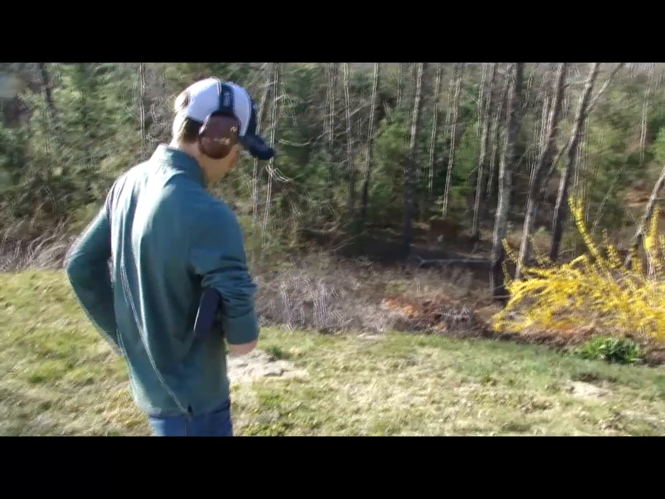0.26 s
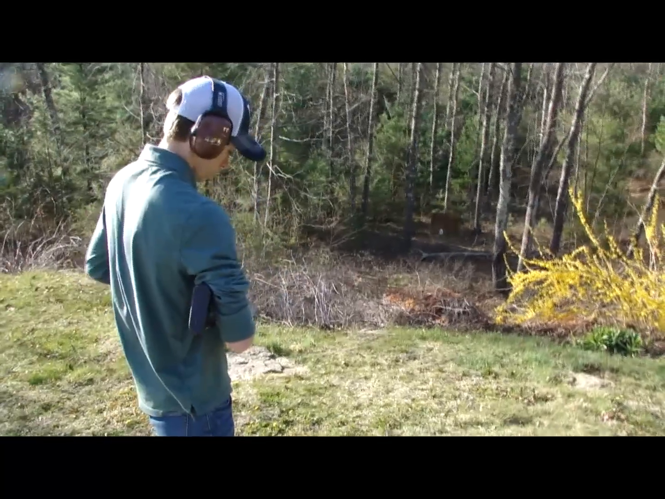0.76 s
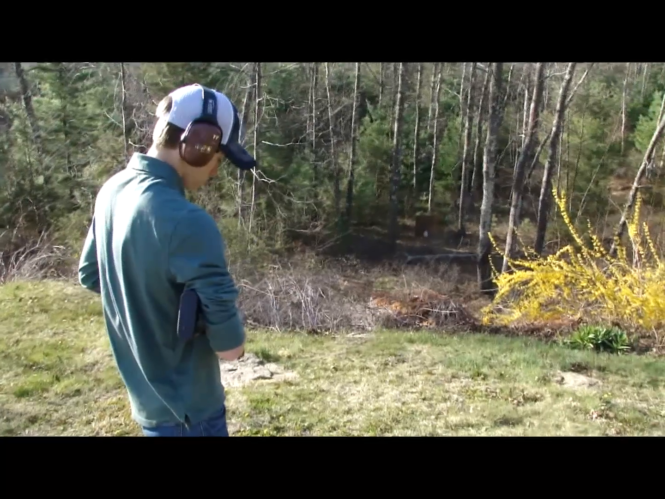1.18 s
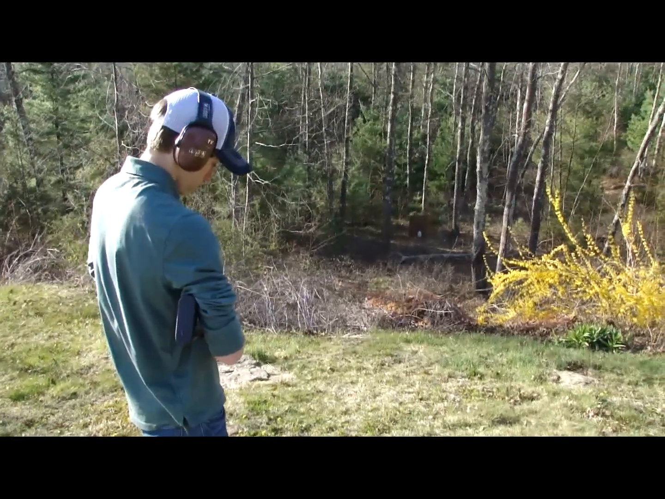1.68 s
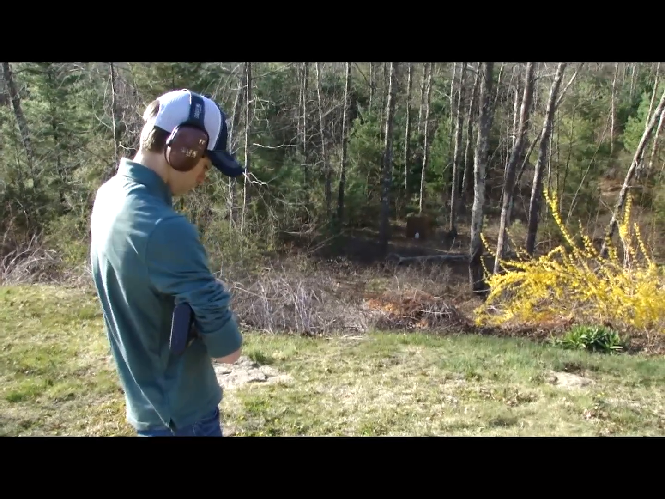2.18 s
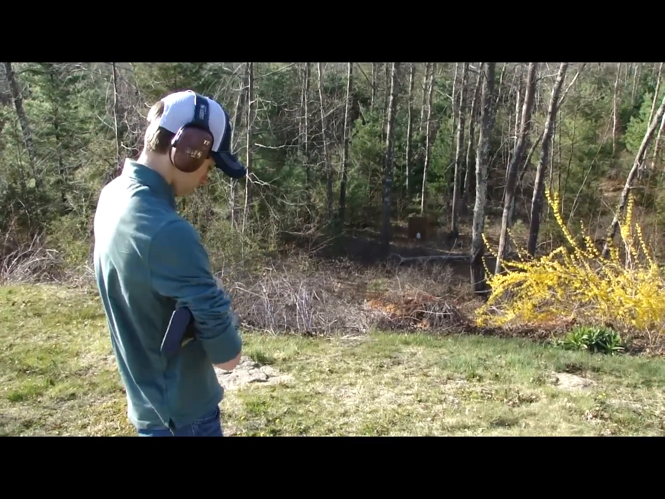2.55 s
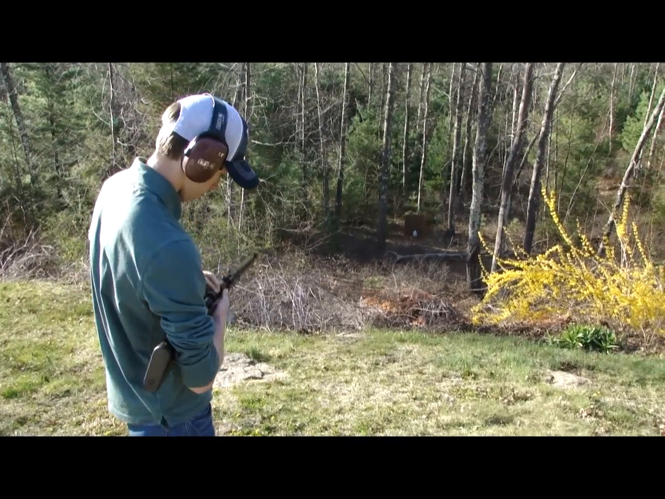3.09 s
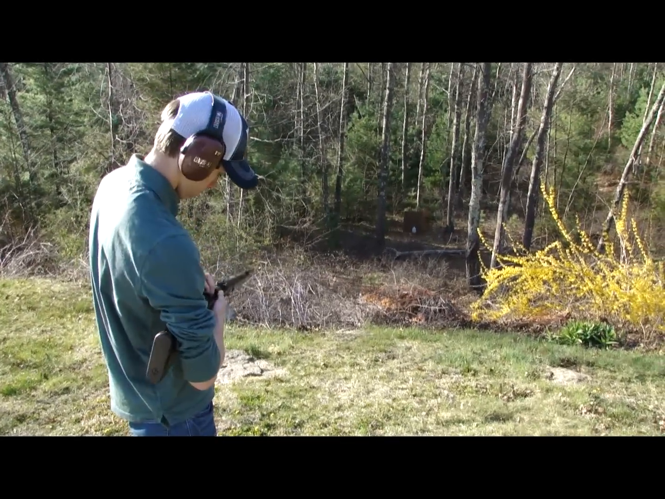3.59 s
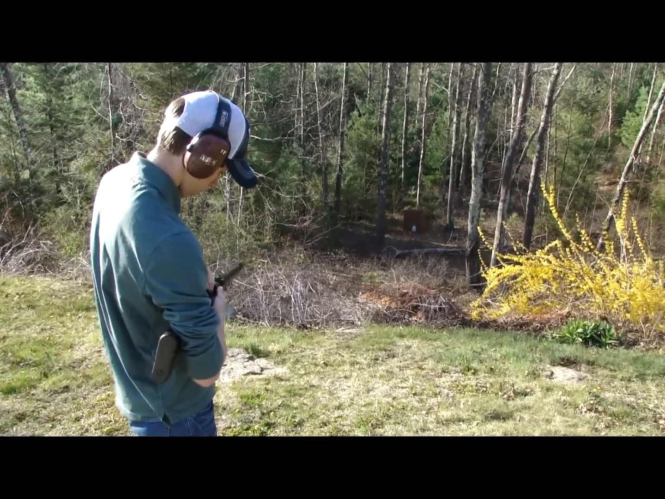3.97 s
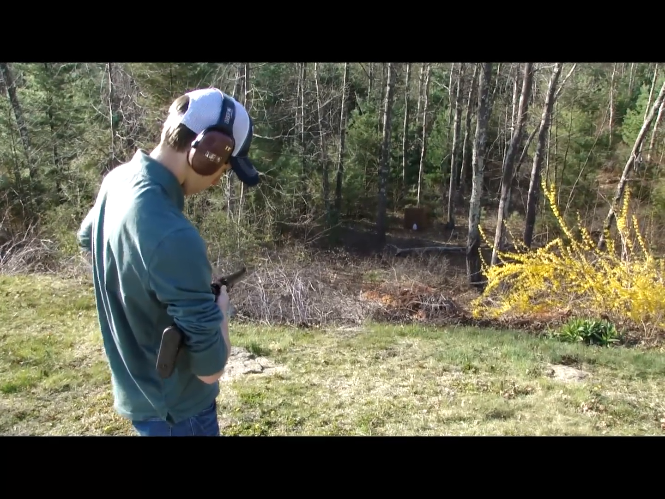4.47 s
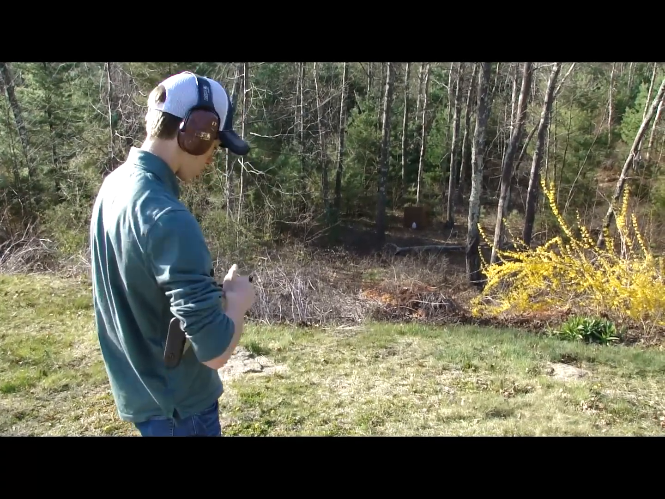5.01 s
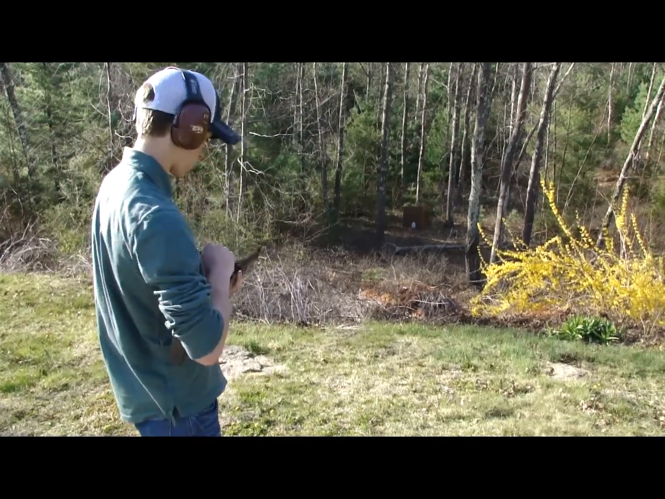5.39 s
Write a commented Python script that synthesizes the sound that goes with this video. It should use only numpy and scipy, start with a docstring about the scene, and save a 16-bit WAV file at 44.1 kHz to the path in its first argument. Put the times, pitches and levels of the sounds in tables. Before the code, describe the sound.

Quiet open air beside a wood: a soft, wide, low-mid hiss with slight drifting, and almost no echo. Around 0.4-0.5 s a hand rummages in a pocket, a short cloth rush with muffled clicks. From 1.1 to 1.9 s come small, dry steel ticks, slightly left, the clearest at 1.4 s, with faint metallic scraping. Two dull, low wind bumps hit the left microphone close together near 2.15 s. A barely audible slide passes around 2.6 s; light clicks follow at 2.9 s, then a firmer one at 3.15 s with a weak puff of wind. Bright, pinging snaps arrive at 3.93 s and a lower double clack at 4.1 s. Mostly hiss remains until a click at 5.3 s. From 5.5 s the bolt is worked hard: a scrape swells rapidly into loud, crowded steel clacks around 5.59-5.65 s, by far the loudest moment, just before the end.

```python
"""A bolt-action rifle is handled by a man on a lawn at the edge of a wood: each blow of its steel parts
excites damped modes and dense clatter, and slides are scrapes made of tiny slips.
A hand rummages in a pocket (shaped noise under pressure strokes); at last the bolt is worked hard.
Quiet outdoor air lies underneath as drifting coloured noise, and a breeze now and then bumps the left
microphone with short bursts of low noise."""
import sys
import numpy as np
from scipy import signal
from scipy.fft import rfft, irfft, next_fast_len
from scipy.io import wavfile
from scipy.ndimage import uniform_filter1d

SR = 44100
rng = np.random.default_rng(int(sys.argv[2]) if len(sys.argv) > 2 else 0)


def bounce(signal):
    """Save signal as a 16-bit WAV file at the path given by the first command-line argument."""
    frames = np.transpose(np.atleast_2d(signal))
    limited = np.clip(frames, -1, 1)
    pcm = np.round(limited * 32767).astype(np.int16)
    wavfile.write(sys.argv[1], SR, pcm)


N = 249165
TIME = np.arange(N) / SR

# Wash of distant trees and microphone hiss. Each row: frequency in Hz, relative level in dB.
AIR_SPECTRUM = [(25, -51), (70, -13.5), (120, -9.5), (170, -3), (280, 1), (650, 1), (1130, -2.5),
                (2000, -6.5), (3300, -10), (5000, -14.5), (7000, -17.5), (10000, -19.5), (11300, -23),
                (12100, -41)]
# Likeness of the air at the two ears. Each row: frequency in Hz, left-right correlation (0 to 1).
AIR_LIKENESS = [(60, 0.31), (140, 0.36), (350, 0.22), (840, 0.18), (2020, 0.13), (4860, 0.54), (11700, 0.6)]
# Stereo balance of the air. Each row: frequency in Hz, left minus right in dB.
AIR_BALANCE = [(60, 9), (170, -2.5), (490, -0.5), (1420, -1.0), (4080, 0), (11700, 0.0)]
# Strokes of the hand in a pocket. Each row: greatest pressure in seconds, level in dB, rise in seconds,
# fall in seconds.
POCKET_STROKES = [(.448, -47.5, 0.071, 0.04), (.497, -43, 0.028, .07)]
# Rush of cloth fibres. Each row: frequency in Hz, relative density in dB per Hz.
CLOTH_SPECTRUM = [(50, -13), (130, -11), (260, 5), (420, 1), (800, 1.5), (1800, -10), (3000, -14.5),
                  (6000, -27), (12000, -33)]
# Blows on steel, muffled at first inside the pocket. Each row: contact in seconds, level in dB before the
# common trim, ping in dB and tick in dB (both against the middle band), contact time in seconds,
# note of the struck part in Hz.
BLOWS = [(0.407, -45, -23, -17, 0.00042, 696), (0.4285, -42.5, -13, -14, 0.00035, 640),
         (0.442, -48, -12, -6, 0.00047, 660), (1.132, -48, -11, -16, .005, 1100),
         (1.202, -46, -9, -12, 0.00088, 1390), (1.2094, -42.5, -3, -15, 0.0021, 1800),
         (1.361, -52, 0, -13, 0.00043, 2000), (1.3958, -31, 6, -7, 0.00065, 1980),
         (1.41, -44, 2, -10, 0.00042, 1450), (1.5437, -45, -16, -25, 0.00078, 1700),
         (1.567, -43, -9, -24, .004, 1700), (1.7091, -48, 7, -16, 0.0016, 2850),
         (1.889, -51, 12, -15, 0.0019, 2470), (1.915, -43.5, -7, -14, 0.0052, 1200),
         (2.854, -53.5, 0, -20, 0.0027, 1860), (2.931, -46, 9, -8, .0006, 1680),
         (3.1488, -38, 1, -9.5, .0002, 1180), (3.155, -44, -11, -22, 0.0013, 1030),
         (3.17, -47.5, -5, -26, 0.0035, 1980), (3.254, -48.5, -9, -21, .004, 1070),
         (3.9298, -38.5, 8, 4, 0.0011, 3400), (3.9315, -32.5, 15, 2.5, 0.00041, 2200),
         (3.9356, -36, -16, -13, 0.00043, 2800), (4.1077, -38, 4, -6, 0.0013, 780),
         (4.1274, -34.5, -2, -3, 0.00051, 2500), (4.1367, -41, 4, -7, 0.0016, 1700),
         (4.869, -53, -22, -14, 0.00313, 1860), (5.313, -43, -4, -27, 0.0022, 1210),
         (5.327, -34, 1.5, -10.5, 0.00063, 1440), (5.512, -49.5, -8, -22, 0.0009, 1420),
         (5.5533, -42.5, -11, -21, 0.00103, 2240), (5.57, -32, 2, -3, .003, 1420),
         (5.5885, -20.5, 4, 1, 0.00037, 1500), (5.606, -31, -16, -3, 0.002, 1530),
         (5.614, -27, 4, 2, 0.00041, 1600), (5.6197, -18.5, -2, -11, 0.000483, 2230),
         (5.623, -16, 5.5, -8.5, 0.000874, 2280), (5.63, -27, -3, 6, 0.0012, 2780),
         (5.635, -14.5, -5.5, -7.5, 0.000736, 2440), (5.6465, -15, -2, -17, 0.00037, 1320)]
# Modes of action and barrel. Each row: frequency in Hz, width in Hz, relative level in dB.
STEEL_MODES = [(811, 42, -3), (984, 28, -3), (1224, 320, -3), (1425, 142, 5), (1668, 59, 0.5),
               (1995, 145, 2), (2190, 170, 0), (2414, 210, 4), (2673, 70, -4.5), (3035, 170, 3),
               (3554, 91, -5.5), (4004, 240, -3.5), (4400, 570, -9.5), (5630, 120, -10), (6740, 180, -19),
               (8050, 320, -4.5), (9700, 200, -26), (10600, 210, -8), (11330, 210, -12.5)]
# Dense clatter between the modes. Each row: frequency in Hz, relative density in dB per Hz.
CLATTER_SPECTRUM = [(100, -57), (300, -7.5), (520, -6), (760, 1), (1400, -0.5), (2600, -8.5), (3900, -8),
                    (5200, -16), (6200, -10), (7300, -18.5), (10000, -13.5), (12000, -51)]
# Edges between the knock, middle, ping and tick bands of a blow, in Hz.
BAND_EDGES_HZ = [1500, 2800, 5500]
# Eddies at the microphone. Each row: centre in seconds, level in dB, length in seconds.
EDDIES = [(0.673, -52.5, 0.029), (0.951, -54.5, 0.078), (2.147, -31.5, 0.011), (2.176, -32, 0.0076),
          (2.58, -48, 0.014), (3.178, -40, 0.031)]
# Noise of an eddy. Each row: frequency in Hz, relative density in dB per Hz.
BUFFET_SPECTRUM = [(20, -40), (60, -18), (125, 1.5), (200, -2), (330, -6), (480, -28), (1000, -48),
                   (4000, -68)]
# Slides of steel on steel. Each row: greatest pressure in seconds, level in dB, rise in seconds,
# fall in seconds.
SLIDE_STROKES = [(1.57, -52, 0.13, 0.072), (1.89, -53.5, 0.13, .08), (2.64, -54, 0.11, 0.31),
                 (3.11, -56.5, .14, 0.074), (3.265, -60, 0.036, 0.088)]
# Resonances of a slide. Each row: frequency in Hz, width in Hz, relative level in dB.
SLIDE_MODES = [(1014, 98, 5.5), (1660, 440, -4.5), (3040, 160, -7.5), (4320, 57, -3)]
# Stereo balance of rifle and cloth. Each row: frequency in Hz, left minus right in dB.
SOURCE_BALANCE = [(500, 3), (2000, 1), (4000, -0.5), (6500, 2.5), (11000, -0.5)]
# Stereo phase of rifle and cloth. Each row: frequency in Hz, lead of the left side in radians.
SOURCE_LEAD = [(500, .05), (1800, 0.033), (4000, 0.15), (10000, 0.76)]


def amp(db):
    """Logarithmic level: decibels become an amplitude gain."""
    return 10 ** (np.asarray(db) / 20)


def evened(x):
    """Mean power: scales a signal to an rms of 1."""
    return x / np.sqrt(np.mean(x ** 2) + 1e-20)


def read(points, hz):
    """Interpolation of a spectrum table on a logarithmic frequency axis."""
    f, value = np.transpose(points)
    return np.interp(np.log(hz + 1), np.log(f + 1), value)


def colour(x, spectrum):
    """Linear filtering: weights each frequency by a table of Hz and dB."""
    gain = amp(read(spectrum, np.fft.rfftfreq(len(x), 1 / SR)))
    return irfft(rfft(x) * gain, len(x))


def add(mix, s, sound):
    """Superposition: adds a sound to the mix from time s in seconds."""
    part = mix[round(s * SR):][:len(sound)]
    part += sound[:len(part)]


def ring(x, modes):
    """Resonance: a force drives a parallel bank of damped oscillators."""
    z = np.fft.rfftfreq(len(x), 1 / SR) + 1e-3
    response = sum(amp(db) / (1 + 1j * (z * z - hz * hz) / (z * width)) for hz, width, db in modes)
    return irfft(rfft(x) * response, len(x))


def split(x):
    """Complementary filtering: four bands, low to high, that sum to the whole."""
    bands = []
    for edge in BAND_EDGES_HZ:
        lowpass = signal.butter(4, edge, fs=SR, output="sos")
        bands.append(signal.sosfiltfilt(lowpass, x))
        x = x - bands[-1]
    return bands + [x]


def strokes(rows, depth_db=20):
    """Pressure envelope: the level climbs by depth_db over each rise and drops as much over each fall."""
    gain = np.zeros(N)
    for s, db, rise, fall in rows:
        distance = np.maximum((s - TIME) / rise, (TIME - s) / fall)
        gain += amp(db - depth_db * distance)
    return gain


def air(level_db=-54.5, patch_db=1.88):
    """Partially coherent noise: distant trees and microphone hiss drift in patches of time and frequency."""
    frames, hz = N // 256 + 5, np.fft.rfftfreq(1024, 1 / SR)
    a, b, c, d, patches = rng.standard_normal((5, len(hz), frames))
    patches = uniform_filter1d(patches, size=12, axis=0)
    patches = evened(uniform_filter1d(patches, size=14, axis=1))
    same = np.clip(read(AIR_LIKENESS, hz), -1, 1)[:, None]
    left, own = a + 1j * b, c + 1j * d
    right = same * left + np.sqrt(1 - same ** 2) * own
    side = amp(read(AIR_BALANCE, hz) / 2)[:, None]
    z = np.array([left * side, right / side])
    z = z * amp(read(AIR_SPECTRUM, hz)[:, None] + patch_db * patches)
    wash = signal.istft(z, nperseg=1024, noverlap=768)[1][:, :N]
    return amp(level_db) * evened(wash)


def pocket():
    """Fibre friction: cloth drags over the hand, countless small contacts blending into a soft rush."""
    return strokes(POCKET_STROKES) * evened(colour(rng.standard_normal(N), CLOTH_SPECTRUM))


def steel_modes(t, contact_s, t60, uneven_db=3.0, out_of_step=2.33):
    """Modal decay: a blow shares its energy among steel modes, which the grip damps together."""
    hz, width, mode_db = np.transpose(STEEL_MODES)[:, :, None]
    # each spot that is struck excites the modes differently
    share = amp(mode_db + uneven_db * rng.standard_normal(hz.shape))
    # loosely in step as the contact ends, then drifting apart
    phase = 2 * np.pi * hz * (t - contact_s) + out_of_step * rng.standard_normal(hz.shape)
    # tabled widths set the decay rate as they stand at a t60 of 0.03 s
    decay = np.exp(-np.pi * width * np.maximum(t, 0) * .03 / t60)
    return (share * np.cos(phase) * decay).sum(0)


def steel_clatter(after, t60, crack_db=5, crack_s=0.0024):
    """High modal density: modes too close to separate act as decaying noise, with a brief crack on top."""
    envelope = amp(-60 * after / t60) + amp(crack_db) * np.exp(-after / crack_s)
    return colour(rng.standard_normal(len(after)), CLATTER_SPECTRUM) * envelope


def contact_rise(t, contact_s, graze_db=-14, graze_s=0.0015):
    """Contact mechanics: parts graze before landing, and a longer contact builds up more slowly."""
    landing = np.minimum(np.maximum(t, 0) / max(contact_s, 1 / SR), 1)
    graze = amp(graze_db) * np.exp(np.minimum(t, 0) / graze_s)
    return np.maximum(landing, graze)


def clack(row, clatter_db=-3, note_db=8.5, note_width_hz=240, radiate_hz=480):
    """Impact excitation: contact time and size of the struck part shape one blow; returns start, sound."""
    s, db, ping_db, tick_db, contact_s, note_hz = row
    # a snap of 0.4 ms contact dies in 27 ms; longer contacts ring longer
    t60 = 0.027 * (contact_s / .0004) ** 0.44
    t = np.arange(-512, 3584) / SR
    rise = contact_rise(t, contact_s)
    modes = rise * steel_modes(t, contact_s, t60)
    clatter = rise * steel_clatter(np.maximum(t, 0), t60)
    sound = evened(modes) + amp(clatter_db) * evened(clatter)
    sound = sound + ring(sound, [(note_hz, note_width_hz, note_db)])
    # small parts radiate little bass
    highpass = signal.butter(2, radiate_hz, "highpass", fs=SR, output="sos")
    bands = split(signal.sosfilt(highpass, sound))
    # larger, lower parts knock more: 10 dB per octave below 2 kHz
    knock_db = -3 - 10 * np.log2(note_hz / 2000)
    gains = amp([knock_db, 0, ping_db, tick_db])
    gains = gains / np.linalg.norm(gains)
    sound = amp(db) * sum(gain * band / np.linalg.norm(band) for gain, band in zip(gains, bands))
    # levels are energies spread over 10 ms
    return s + t[0], sound * np.sqrt(SR / 100) * signal.windows.tukey(len(t), .1)


def rebound(row, delay_s=.008, weaker_db=-16, duller_db=-3, lower=0.82):
    """Inelastic rebound: a part settles with a second, weaker and duller touch."""
    s, db, ping_db, tick_db, contact_s, note_hz = row
    return clack((s + delay_s, db + weaker_db, ping_db + duller_db, tick_db + duller_db,
                  contact_s, note_hz * lower))


def steel_blows(trim_db=-3.0):
    """Superposition of impacts: every blow and its rebound."""
    blows = np.zeros(N)
    for row in BLOWS:
        add(blows, *clack(row))
        add(blows, *rebound(row))
    return amp(trim_db) * blows


def breeze(wake_db=-11, wake_lengths=8.1, right_share=-0.1):
    """Turbulent pressure: eddies push on the left port and pull weakly on the right one."""
    push = np.zeros(N)
    t = np.arange(-SR // 4, SR // 4) / SR
    for s, db, length in EDDIES:
        core = np.exp(-(2 * t / length) ** 4)
        # a weaker, longer stir of air around the eddy
        wake = amp(wake_db) * np.exp(-(2 * t / (length * wake_lengths)) ** 2)
        swirl = colour(rng.standard_normal(len(t)) * (core + wake), BUFFET_SPECTRUM)
        add(push, s + t[0], amp(db) * np.sqrt(length * SR) * swirl / np.linalg.norm(swirl))
    return np.array([push, right_share * push])


def friction(slips_per_s, spread_db):
    """Stick-slip: tiny random slips of uneven size, close enough to merge into a scrape."""
    size = amp(spread_db * np.minimum(rng.exponential(1, N), 4))
    return size * rng.choice([-1, 1], N) * (rng.random(N) < slips_per_s / SR)


def steel_slides():
    """Friction-driven resonance: steel slides lightly on steel under strokes of pressure."""
    scrape = ring(friction(slips_per_s=3200, spread_db=4.5), SLIDE_MODES)
    return strokes(SLIDE_STROKES) * evened(scrape)


def bolt_speed(start_s=5.512, grip_s=0.011, start_db=-53, db_per_s=225):
    """Acceleration as gain: the bolt grips, then grows louder as it gathers speed."""
    since = np.maximum(TIME - start_s, 0)
    return np.minimum(since / grip_s, 1) * amp(start_db + db_per_s * since)


def bolt_run(raceway_db=-7):
    """Friction-driven resonance: slips in the raceway excite the steel modes and the clatter."""
    drag = friction(slips_per_s=4100, spread_db=3.5)
    run = evened(ring(drag, STEEL_MODES)) + amp(raceway_db) * evened(colour(drag, CLATTER_SPECTRUM))
    run = evened(colour(run, [(900, -1), (2200, 2.0), (4500, -1.0), (9000, -7.0)]))
    return bolt_speed() * run


def rifle():
    """Superposition of impact and friction: blows, light slides and the run of the bolt."""
    return steel_blows() + steel_slides() + bolt_run()


def outdoors(x, scatter_db=-20, scatter_t60=0.1, wood_db=-33, wood_t60=0.67, width_db=-14):
    """Scattering: the man is a little to the left, the ground scatters his sounds, trees return a trace."""
    size = next_fast_len(N + SR // 10)
    hz = np.fft.rfftfreq(size, 1 / SR)
    side = amp(read(SOURCE_BALANCE, hz) / 2) * np.exp(.5j * read(SOURCE_LEAD, hz))
    heard = irfft(rfft(x, size) * np.array([side, 1 / side]), size)[:, :N]
    t = np.arange(SR // 2) / SR
    # the shortest paths round arm and camera body reach the two ports differently, most in the treble
    near = rng.standard_normal(len(t)) * np.exp(-t / 0.0015)
    near = colour(near, [(1500, -25), (4000, -2), (9000, -8), (12000, -15)])[:SR // 50]
    difference = signal.fftconvolve(x, near / np.linalg.norm(near))[:N]
    heard = heard + amp(width_db) * np.array([[1], [-1]]) * difference
    for db, t60, delay in [(scatter_db, scatter_t60, .006), (wood_db, wood_t60, .04)]:
        echoes = []
        for _ in range(2):
            tail = rng.standard_normal(len(t)) * amp(-60 * t / t60) * (t > delay)
            tail = colour(tail, [(1500, -12.0), (4000, -17), (10000, -25.0)])
            echoes.append(signal.fftconvolve(x, tail / np.linalg.norm(tail))[:N])
        heard = heard + amp(db) * np.array(echoes)
    return heard


def scene():
    """Superposition in the open air: rifle and clothing, breeze and background."""
    return outdoors(rifle() + pocket()) + breeze() + air()


def record(dry, edge_hz=12150):
    """Band limitation: a linear-phase low-pass sets the camera's upper edge."""
    lowpass = signal.firwin(255, edge_hz, window=("kaiser", 8), fs=SR)
    return signal.oaconvolve(dry, lowpass[None], "same")


dry = scene()
out = record(dry)
bounce(out)
```